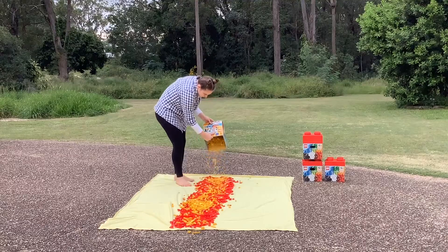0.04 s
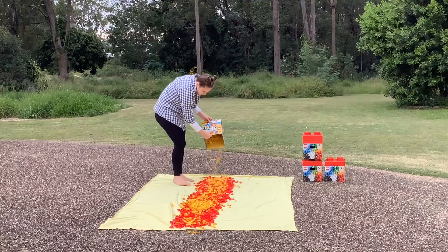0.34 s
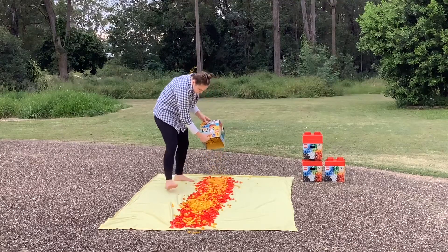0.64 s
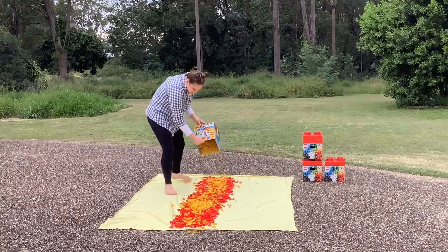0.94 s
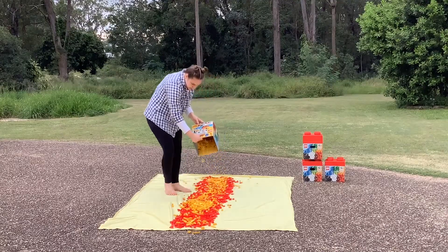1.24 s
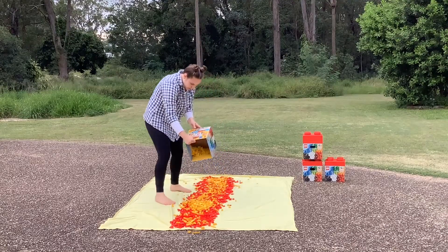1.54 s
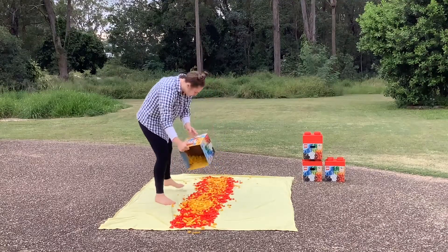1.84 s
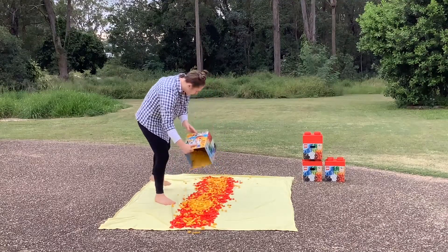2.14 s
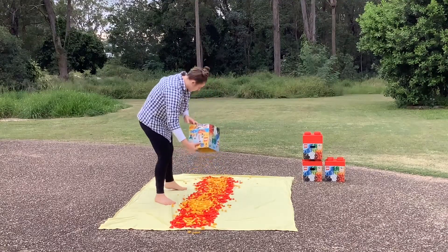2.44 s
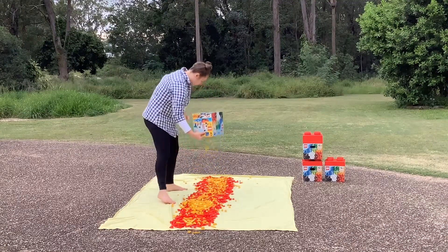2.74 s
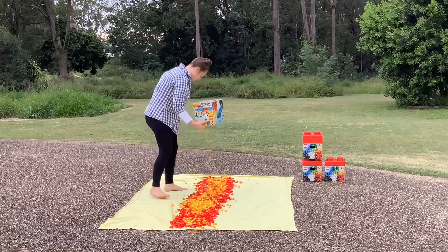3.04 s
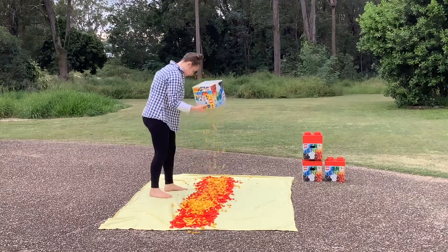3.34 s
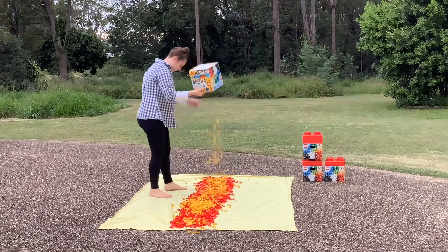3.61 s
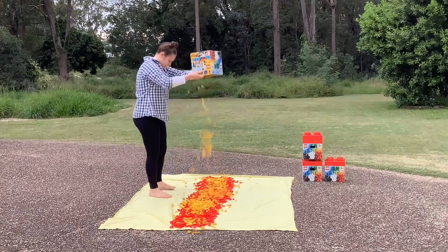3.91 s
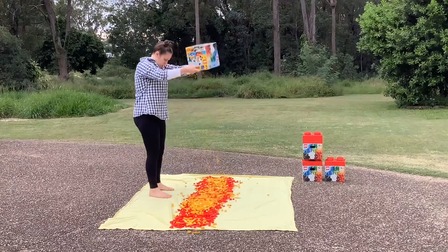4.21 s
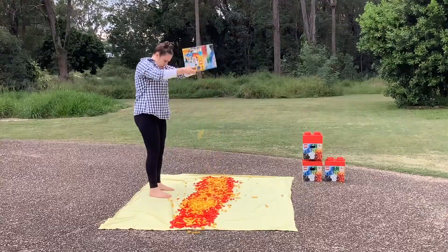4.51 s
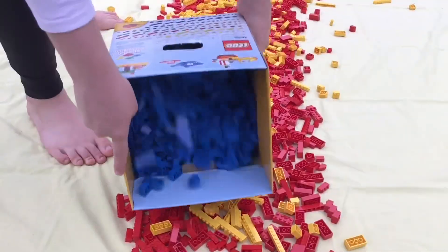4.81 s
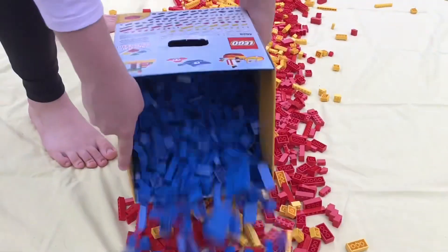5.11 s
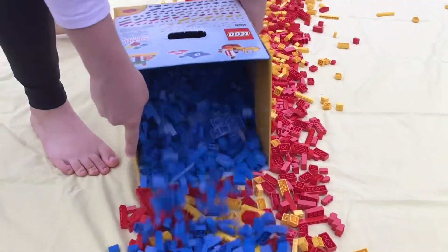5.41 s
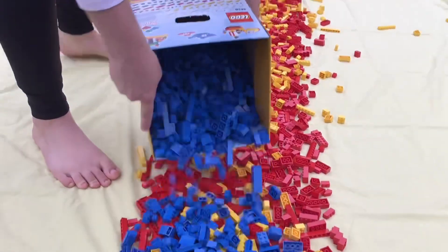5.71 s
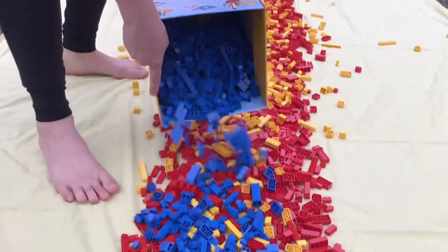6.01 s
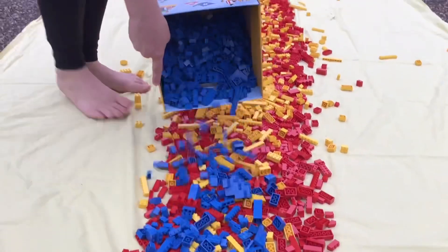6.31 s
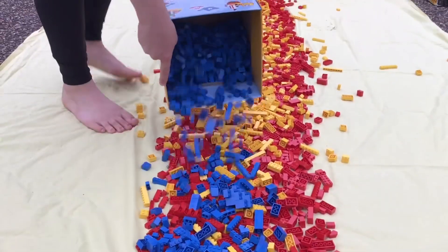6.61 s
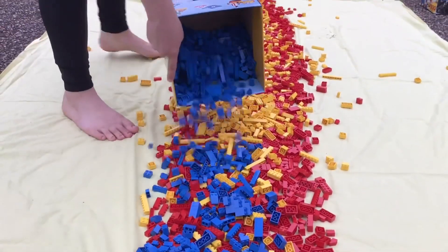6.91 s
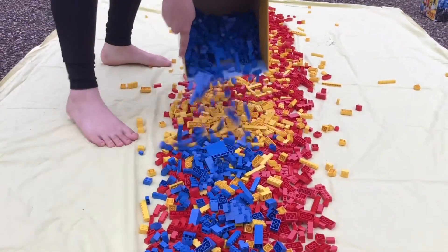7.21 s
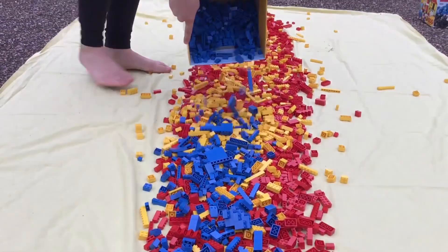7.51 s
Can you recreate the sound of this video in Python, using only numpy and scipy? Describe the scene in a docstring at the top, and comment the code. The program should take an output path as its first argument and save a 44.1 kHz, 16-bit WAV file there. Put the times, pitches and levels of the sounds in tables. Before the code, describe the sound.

Small plastic bricks are shaken from an almost empty cardboard box at a distance, giving light rasps, hollow knocks and scattered clicks, with two faint rising whistles early on. Then the sound jumps close and loud as a full box empties onto a heap of bricks, with a dull rush turning into bright, slightly distorted clatter. The pour stalls briefly and resumes. A low outdoor rumble lies underneath.

```python
"""Plastic toy bricks poured from a cardboard box onto a pile on a cloth mat, over a low outdoor rumble. First,
some metres off, the last bricks rasp about in a nearly empty box, which knocks as they are shaken out in small
clacks; two faint, far whistles rise. At 4.7 s the scene changes: close by, a full box is being tipped, the load
slumps, then bricks drum on the cardboard and clatter on the pile, loud enough to overload."""
import sys
import numpy as np
from scipy import signal
from scipy.fft import rfft, irfft
from scipy.io import wavfile
from scipy.ndimage import uniform_filter1d

SR = 44100
rng = np.random.default_rng(int(sys.argv[2]) if len(sys.argv) > 2 else 0)


def to_wav(s):
    """Save 16-bit WAV."""
    ch = np.atleast_2d(s).T  # columns
    pcm = np.round(np.clip(ch, -1, 1) * 32767)  # PCM
    wavfile.write(sys.argv[1], SR, pcm.astype(np.int16))


N = 341775
TIME = np.arange(N) / SR
RING_TIME = TIME[:2048]
SCENE_CHANGE_S = 4.743   # the scene changes to the full box close by

# handfuls settling on the pile: t/s, peak/dB, 20 dB fade/s (negative: silent)
SPILLS = [(0.029, -35.5, 0.5), (0.32, -40, 0.3), (0.54, -44.5, 0.44), (0.7, -54, 0.2), (1.29, -43, 0.24),
          (1.51, -47.5, 0.23), (1.83, -47, 1.1), (2.245, -46, -0.06), (2.33, -50, 0.5), (2.47, -49, 0.64),
          (3.03, -36, 0.4), (3.51, -36, 1.3), (3.66, -28.5, 0.06), (3.81, -26.5, 0.2), (4.125, -23, 0.16),
          (4.28, -34, 0.32), (5.31, -13, 0.58), (6.4, -14, -0.15), (6.75, -15, -0.3)]
# bricks and small clumps landing: t/s, plastic ring/dB, hollow body/dB, brick's note/Hz
LANDINGS = [(0.132, -22, -31.5, 7800), (0.16, -25, -38, 9300), (0.3315, -16.5, -35, 8100),
            (0.346, -19, -34, 9840), (0.423, -22.5, -56, 5500), (0.5203, -21, -46, 9340),
            (0.5426, -19.5, -35, 6470), (0.6534, -20, -40, 9360), (0.7793, -25, -38.5, 12200),
            (0.884, -33.5, -44, 8500), (1.255, -39, -26.5, 4660), (1.2974, -19, -34, 9750),
            (1.491, -24, -37, 9730), (1.509, -22.5, -32, 6200), (1.6824, -21.5, -36, 9000),
            (1.753, -15.5, -38, 8130), (2.169, -56, -26, 5300), (2.2228, -29, -37.5, 3980),
            (2.2448, -24, -36, 10150), (2.319, -23, -42, 5640), (2.4384, -26, -56, 5570),
            (2.4774, -25, -53, 7790), (2.4862, -22.5, -37.5, 9000), (2.604, -23, -36, 4800),
            (2.7756, -28.5, -45, 6150), (3.0143, -18, -37, 5770), (3.0218, -16.5, -52, 6640),
            (3.0485, -12.5, -45, 8100), (3.095, -21, -44, 10100), (3.1692, -25, -42, 5300),
            (3.251, -22, -37.5, 8000), (3.289, -21, -70, 10300), (3.3312, -23.5, -40, 6500),
            (3.379, -17.5, -52, 5900), (3.438, -21, -50, 10500), (3.4977, -17, -50, 9900),
            (3.5502, -12, -52, 9700), (3.5685, -24, -37, 11200), (3.7573, -15, -46, 9850),
            (3.7936, -14, -35, 12100), (3.8186, -12.5, -37, 6400), (3.91, -18, -32, 10600),
            (3.927, -14.5, -49, 5660), (4.035, -17.5, -38, 5200), (4.0783, -14.5, -43, 5200),
            (4.1147, -9, -36, 5530), (4.134, -8.5, -41, 8160), (4.1666, -9.5, -32, 5570),
            (4.215, -14, -55, 5600), (4.254, -15.5, -46, 10050), (4.3493, -18, -37, 5950),
            (4.3939, -16, -46, 5700), (4.5362, -23, -36, 5500), (4.6109, -18, -44, 5700),
            (4.743, -33.5, -44, 5600), (4.8273, -8, -4.5, 4400), (4.862, -13, -6, 9420),
            (5.1751, 0, -26, 8900), (5.707, -11, -24, 11700), (6.2659, -8.5, -17, 5560),
            (6.306, -11, -30, 5640), (6.324, -7.5, -26, 6400), (6.3777, -7, -48, 8200),
            (6.488, -25.5, -16, 6400), (6.4995, -3, -20.5, 5700), (6.6171, -30, -12, 5100),
            (6.6944, -7.5, -8.5, 5610), (6.8785, -10, -13, 5510), (7.011, -4.5, -11, 4220),
            (7.047, -10, -7, 4970), (7.111, -3.5, -15, 10200), (7.1659, -6, -10.5, 4230),
            (7.2344, -8.5, -12, 4460), (7.2514, -27, -9.5, 5030), (7.2903, -8, -18, 9550),
            (7.3281, -11, -14, 9250), (7.443, -28, -10, 5750), (7.4567, -11, -18, 4260),
            (7.488, -11, -25, 9900), (7.5316, -14.5, -13.5, 8300), (7.6, -10, -12.5, 4640)]
# cardboard box response: f/Hz, level/dB
BOX_SPECTRUM = [(150, -27.5), (400, 4.5), (680, -11.5), (900, -6.5), (1500, -7.5), (2500, -2.5),
                (3100, 1.5), (4000, 0.5), (5200, 1), (7000, 0), (10000, -1), (15000, -7.5)]


def from_db(db):
    return 10 ** (np.asarray(db) / 20)


def unit_rms(x):
    return x / np.sqrt(np.mean(x ** 2) + 1e-20)


def local_rms(x, window_s):
    return np.sqrt(np.maximum(uniform_filter1d(x ** 2, max(int(window_s * SR), 2)), 0) + 1e-12)


def add(out, at_s, sound):
    at = max(int(at_s * SR), 0)
    out[at:at + len(sound)] += sound[:N - at]


def between(rows, from_s, to_s):
    return [row for row in rows if from_s <= row[0] < to_s]


def colour(x, spectrum, modes=()):
    """Minimum-phase filter. Spectrum: f/Hz, level/dB. Modes: f/Hz, width/Hz, lift/dB."""
    hz = np.linspace(0, SR / 2, len(RING_TIME) * 2 + 1)
    points_hz, level_db = np.transpose(spectrum)
    shape_db = np.interp(np.log(hz + 1), np.log(points_hz), level_db)
    for centre_hz, width_hz, lift_db in modes:
        shape_db += lift_db / (1 + (2 * (hz - centre_hz) / width_hz) ** 2)
    cepstrum = irfft(np.log(from_db(shape_db)))
    cepstrum[1:len(hz) - 1] *= 2
    cepstrum[len(hz):] = 0
    return signal.oaconvolve(x, irfft(np.exp(rfft(cepstrum))))[:len(x)]


def ring(hz, level_db, t60_s):
    """Sum of struck, decaying modes."""
    hz, level_db, t60_s = [np.reshape(v, (-1, 1)) for v in (hz, level_db, t60_s)]
    sign = rng.choice([-1, 1], hz.shape)
    decay = from_db(level_db - 60 * RING_TIME / t60_s)
    return np.sum(sign * decay * np.sin(2 * np.pi * hz * RING_TIME), axis=0)


def snap(t60_s):
    """Broadband burst of a hard contact."""
    return rng.standard_normal(len(RING_TIME)) * from_db(-60 * RING_TIME / t60_s)


def stream(contact, per_s, spread_db, even_s, count):
    """Random collisions of uneven strength among `count` pieces, levelled to RMS 1 over even_s."""
    out = np.zeros(N)
    pieces = [contact() for _ in range(count)]
    hits = np.flatnonzero(rng.random(N) < per_s / SR)
    sizes = from_db(spread_db * np.minimum(rng.exponential(1, N), 4)) * rng.choice([-1, 1], N)
    struck = rng.integers(0, count, N)
    for at in hits:
        out[at:at + len(RING_TIME)] += sizes[at] * pieces[struck[at]][:N - at]
    return out / np.sqrt(uniform_filter1d(local_rms(out, even_s) ** 2, int(even_s * SR)))


def surge(peak_s, peak_db, rise_s, fade_s):
    """Power of a rush of bricks; rise and fade times span the top 20 dB."""
    away = np.linspace(0, 4, num=41)
    power = from_db(peak_db - 20 * away ** 1.21) ** 2   # lingers near the peak, then drops fast
    times_s = np.r_[peak_s - rise_s * away[::-1], peak_s + fade_s * away[1:]]
    return np.interp(TIME, times_s, np.r_[power[::-1], power[1:]], left=0, right=0)


def rumble():
    """Low outdoor noise, drifting in level."""
    # rumble spectrum: f/Hz, level/dB
    spectrum = [(30, -31), (43, -35), (55, -13), (80, 2), (115, -5.5), (165, -6), (240, -12.5), (400, -24),
                (750, -26.5), (1200, -34), (2500, -52), (3300, -35), (4500, -52), (15000, -84)]
    # rumble loudness: t/s, level/dB
    levels = [(0, -42), (2.5, -40), (3.0, -38.5), (3.7, -39.5), (4.7, -42.5), (4.8, -39.5), (7.75, -35.5)]
    gain = from_db(np.interp(TIME, *np.transpose(levels)))
    return gain * unit_rms(colour(rng.standard_normal(N), spectrum))


def tap(t60_cycles=47.0):
    """Brick on cardboard or loose heap: a few damped modes that depend on the spot."""
    hz = np.exp(rng.uniform(np.log(750), np.log(5500), size=7))
    contact = from_db(3) * snap(t60_s=0.008)
    return unit_rms(ring(hz, rng.normal(0, 2.8, size=7), t60_cycles / hz) + contact)


def thuds():
    """The bricks' weight sounds the box floor and the air behind it."""
    # box floor response: f/Hz, level/dB
    spectrum = [(60, -29.5), (160, -10.5), (240, -6), (370, 0.5), (500, -6), (680, -6), (820, -5.5),
                (1350, -7), (2000, -21), (4000, -27)]
    impacts = stream(lambda: snap(t60_s=0.0035), per_s=700, spread_db=2.0, even_s=0.096, count=96)
    return unit_rms(colour(impacts, spectrum))


def slide_motion(shift_db=-64, shift_hz=1390):
    """Strength and rasp centre: bell-shaped slides, with slight shifting between them."""
    # slides in the tilted box: middle/s, length/s, peak/dB, rasp centre/Hz
    slides = [(0.04, 0.34, -39, 1770), (0.308, 0.2, -43, 1730), (0.594, 0.16, -53.5, 2210),
              (1.13, 0.22, -47, 1520), (1.33, 0.25, -43, 1550), (1.714, 0.14, -46.5, 1750),
              (1.904, 0.2, -34.5, 1390), (2.044, 0.16, -44, 1600), (2.35, 0.12, -48.5, 1330),
              (2.733, 0.32, -44, 950), (3.15, 0.27, -58, 1240), (3.492, 0.28, -45, 810),
              (3.71, 0.19, -44, 870), (3.9, 0.18, -47, 1570), (4.158, 0.1, -43, 2020),
              (4.387, 0.33, -55, 2200)]
    power = from_db(shift_db) ** 2
    weighted_hz = power * shift_hz
    for middle_s, length_s, db, hz in slides:
        bell = from_db(db) ** 2 * np.exp(-2 * np.minimum((2 * (TIME - middle_s) / length_s) ** 2, 20))
        power += bell
        weighted_hz += bell * hz
    return np.sqrt(power), weighted_hz / power


def rasp(centre_hz, width_octaves=0.38, skirt_db_per_octave=5.0):
    """Bricks scrape along cardboard: low and hollow when slow, higher and broader when fast."""
    grains = stream(tap, per_s=2600, spread_db=7.5, even_s=0.13, count=128)
    skirt = from_db(skirt_db_per_octave * np.log2(centre_hz / np.median(centre_hz)))
    edges_hz = np.geomspace(560, 5600, num=11)
    out, power = 0, 0
    for low_hz, high_hz in zip(edges_hz, edges_hz[1:]):
        band = signal.sosfilt(signal.butter(2, [low_hz, high_hz], "band", fs=SR, output="sos"), grains)
        away = np.log2(np.sqrt(low_hz * high_hz) / centre_hz) / width_octaves
        gain = np.exp(-away ** 2) + skirt * (1 + np.tanh(away)) / 2   # peak plus treble tail
        out = band * gain - out   # alternating signs join the bands smoothly
        power += gain ** 2 * np.var(band)
    return from_db(-3) * out / np.sqrt(power) + from_db(-6.5) * thuds()


def spill_power(rows):
    """Handfuls hit the pile and settle."""
    return sum(surge(at_s, db, rise_s=0.036, fade_s=fade_s) for at_s, db, fade_s in rows if fade_s > 0)


def brick(note_hz=None, detune=0.014, spread_db=2.0, rise_s=0.00035):
    """One brick's click: modes common to all bricks, a few of its own shape, and a snap."""
    # common brick modes: f/Hz, level/dB, t60/s
    modes = [(3200, 1.5, 0.015), (5594, -7.5, 0.041), (6530, -1.5, 0.02), (8210, -3.5, 0.027),
             (9500, 0.5, 0.012), (10110, 1.5, 0.016), (13100, 0, 0.024)]
    hz, level_db, t60_s = np.transpose(modes)
    hz = hz * (1 + detune * rng.standard_normal(len(hz)))
    click = ring(hz, level_db + spread_db * rng.standard_normal(len(hz)), t60_s)
    own_hz = rng.uniform(3280, 14900, size=6)
    click += ring(own_hz, level_db=rng.normal(0, 4.7, size=6), t60_s=0.033)
    click += from_db(9) * snap(t60_s=0.009)
    if note_hz:
        click += ring(note_hz, level_db=13.0, t60_s=0.013)
    return unit_rms(click * (1 - np.exp(-RING_TIME / rise_s)))   # edges and studs touch in turn


def ping():
    """A small piece bounces free and rings on one high note."""
    return unit_rms(ring(hz=rng.uniform(8000, 14500), level_db=0, t60_s=0.025))


def clatter(per_s, spread_db, even_s, pings_db):
    """Brick-on-brick collisions with scattered pings."""
    pings = stream(ping, per_s=70, spread_db=4.5, even_s=0.25, count=128)
    return stream(brick, per_s, spread_db, even_s, count=192) + from_db(pings_db) * pings


def knocks():
    """A panel of the shaken box gives a short, hollow note."""
    # panel knocks: t/s, relative level/dB, f/Hz
    hits = [(0.056, -41.5, 394), (0.155, -44, 396), (3.695, -35.5, 570), (3.723, -43, 550),
            (3.807, -38, 567), (3.915, -44.5, 560), (6.36, -28.5, 387)]
    out = np.zeros(N)
    for at_s, db, panel_hz in hits:
        note = ring(hz=[panel_hz, 860], level_db=[0, -9], t60_s=[0.035, 0.025])
        add(out, at_s, from_db(db + 12) * note)
    return out


def edge_tick():
    """A sharp corner touches first: short and bright."""
    return signal.sosfilt(signal.butter(2, 11000, "high", fs=SR, output="sos"), snap(t60_s=0.0065))


def bounces(contact, bounce_s, loss_db, count=4):
    """First hit and quick, weaker rebounds; peak short-term RMS 1."""
    out = np.zeros(len(RING_TIME) * 3)
    gaps_s = bounce_s * rng.uniform(0.37, 1.7, count)
    for k, at_s in enumerate(np.cumsum(gaps_s) - gaps_s[0]):
        add(out, min(at_s, len(RING_TIME) / SR), contact() * from_db(-loss_db * k))
    return out / local_rms(out, window_s=0.0017).max()


def clacks(rows, ring_db, body_db, tick_db, bounce_s, loss_db):
    """Landings as two signals: tick plus plastic ring, and hollow body."""
    rings, bodies = np.zeros(N), np.zeros(N)
    for at_s, plastic_db, hollow_db, note_hz in rows:
        add(rings, at_s, from_db(plastic_db + tick_db) * edge_tick())
        clicks = bounces(lambda: brick(note_hz), bounce_s, loss_db)
        add(rings, at_s, from_db(plastic_db + ring_db) * clicks)
        add(bodies, at_s, from_db(hollow_db + body_db) * bounces(tap, bounce_s, loss_db))
    return rings, bodies


def last_bricks(rattle_db=-9, rattle_db_per_octave=4):
    """Nearly empty box, metres off: bricks slide, jostle (more when fast) and trickle out."""
    # plastic heard from afar: f/Hz, level/dB
    far_spectrum = [(300, -21), (1200, -23), (2100, -10.5), (2800, -17.5), (4300, -13.5), (5600, -8),
                    (7400, -7.5), (10000, -9), (11500, -13), (15500, -21.5)]
    on = TIME < SCENE_CHANGE_S
    slide, centre_hz = slide_motion()
    jostle = slide * from_db(rattle_db + rattle_db_per_octave * np.log2(centre_hz / np.median(centre_hz)))
    rattle = on * from_db(10) * np.sqrt(spill_power(between(SPILLS, 0, SCENE_CHANGE_S)) + jostle ** 2)
    rings, bodies = clacks(between(LANDINGS, 0, SCENE_CHANGE_S),
                           ring_db=1.5, body_db=0.5, tick_db=12.0, bounce_s=0.0035, loss_db=4.0)
    trickle = rattle * clatter(per_s=420, spread_db=4.0, even_s=0.074, pings_db=-17.0)
    box = colour(bodies, BOX_SPECTRUM, modes=[(2010, 180, 7.2)])
    return colour(rings + trickle, far_spectrum) + box + on * slide * rasp(centre_hz) + knocks()


def whistles():
    """Faint, far tones that glide up as they swell and fade."""
    # glides: t/s, length/s, start f/Hz, end f/Hz, level/dB
    glides = [(0.923, 0.132, 1290, 1560, -57), (1.57, 0.12, 1400, 1620, -54.5)]
    out = np.zeros(N)
    for at_s, length_s, from_hz, to_hz, db in glides:
        hz = np.linspace(from_hz, to_hz, int(length_s * SR))
        tone = np.sin(2 * np.pi * np.cumsum(hz) / SR)
        add(out, at_s, from_db(db) * signal.windows.hann(len(hz)) * tone)
    return out


def pour_flow():
    """Flow from the full box: it stalls and is tipped again; each shake adds a surge."""
    # underlying flow: t/s, level/dB
    levels = [(4.743, -39), (4.77, -21), (4.84, -13.5), (4.9, -8), (5.07, -8), (5.15, -13), (5.401, -13.5),
              (5.6, -16.5), (5.9, -16), (5.975, -22), (6.15, -18.5), (6.29, -25), (6.4, -39.5), (6.49, -26),
              (6.69, -13.5), (6.86, -19.5), (7.28, -19), (7.5, -27.5), (7.75, -24)]
    # shakes of the box: t/s, peak/dB
    shakes = [(4.925, -8.5), (5.01, -9), (5.325, -15), (5.555, -16.5), (6.018, -14.5), (6.08, -19),
              (6.145, -19), (6.36, -25), (6.66, -13.5), (6.935, -15.5), (6.997, -12), (7.114, -13.5),
              (7.25, -23.5), (7.395, -18), (7.697, -17.5)]
    poured = from_db(np.interp(TIME, *np.transpose(levels)))
    shaken_power = sum(surge(at_s, db, rise_s=0.041, fade_s=0.038) for at_s, db in shakes)
    return np.sqrt(poured ** 2 + shaken_power)


def drumming(flow, clumps_per_s=16, clump_db=1.7):
    """Bricks tumble over the cardboard in uneven clumps."""
    taps = stream(tap, per_s=1800, spread_db=3.0, even_s=0.17, count=256)
    swells_db = rng.normal(0.02, clump_db, size=400)
    clumps = from_db(np.interp(TIME * clumps_per_s, np.arange(len(swells_db)), swells_db))
    return flow * taps * clumps


def loosening(drum, tumble_s=0.28, dull_hz=2300):
    """The packed load shifts with a dull rush, then brightens as it breaks up."""
    dull = signal.sosfilt(signal.butter(1, dull_hz, fs=SR, output="sos"), drum)
    loose = np.clip((TIME - SCENE_CHANGE_S) / tumble_s, 0, 1) ** 2
    return dull + loose * (drum - dull)


def pile_response(flow, fall_s=0.004, settle_s=0.048, even_pour_db=-17):
    """Clatter strength: the flow, delayed by the fall and smoothed as bricks settle."""
    pole = np.exp(-1 / (settle_s * SR))
    settling = signal.lfilter([1 - pole], [1, -pole], flow / from_db(even_pour_db))
    return np.interp(TIME - fall_s, TIME, settling) ** 0.87   # swings less than the flow


def full_box(clatter_db=-17.5, thud_db=-9.0, lighten_db_per_s=0.8):
    """Close pour: one flow drums on the box floor, weighs on it and clatters on the pile."""
    # loaded box resonances: f/Hz, width/Hz, lift/dB
    box_modes = [(867, 44, -6), (1028, 74, 3), (1328, 120, 6), (1658, 450, 7), (2195, 330, 6.5),
                 (2560, 270, 4.5), (4530, 700, 5.5)]
    # plastic heard close by: f/Hz, level/dB
    near_spectrum = [(500, -83), (3000, -8.5), (5500, 2.5), (6500, -1), (7500, -10), (8200, 0), (9600, 0),
                     (11000, -7.5), (13000, -11.5), (15500, -26)]
    on = TIME >= SCENE_CHANGE_S
    flow = on * pour_flow()
    pile_power = (from_db(clatter_db) * pile_response(flow)) ** 2
    rattle = np.sqrt(pile_power + spill_power(between(SPILLS, SCENE_CHANGE_S, np.inf)))
    rings, bodies = clacks(between(LANDINGS, SCENE_CHANGE_S, np.inf),
                           ring_db=-3.0, body_db=0.0, tick_db=8.0, bounce_s=0.0023, loss_db=1.5)
    box = colour(loosening(drumming(flow) + bodies), BOX_SPECTRUM, box_modes)
    pile = rattle * clatter(per_s=600, spread_db=1.0, even_s=0.27, pings_db=-6.0)
    load = from_db(thud_db - lighten_db_per_s * (TIME - SCENE_CHANGE_S))   # thuds less as it empties
    # the whole load drops onto the box's side
    slump_power = on * surge(peak_s=4.81, peak_db=-22, rise_s=0.076, fade_s=0.78)
    weight = np.sqrt((load * flow) ** 2 + slump_power) * thuds()
    return box + colour(pile + rings, near_spectrum) + weight


def outdoors(x, t60_s, wet_db, rise_s=0.01):
    """Adds faint scatter from ground and trees."""
    t = TIME[:SR // 2]
    tail = rng.standard_normal(len(t)) * from_db(-60 * t / t60_s) * (1 - np.exp(-t / rise_s))
    return x + from_db(wet_db) * signal.oaconvolve(x, tail / np.linalg.norm(tail))[:N]


def scene():
    """Two pours, far then near, over the rumble; mono."""
    far = last_bricks() + whistles()
    near = full_box()
    mix = rumble() + outdoors(far, t60_s=0.11, wet_db=-13.0) + outdoors(near, t60_s=0.9, wet_db=-19.0)
    return mix[None]


def record(dry):
    """Peaks clip at full scale; steep low-pass at 15.7 kHz."""
    lowpass = signal.ellip(12, 0.1, 80, 15700, fs=SR, output="sos")
    return signal.sosfilt(lowpass, np.clip(dry, -1, 1))


dry = scene()
out = record(dry)
to_wav(out)
```